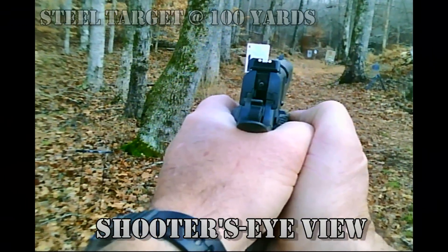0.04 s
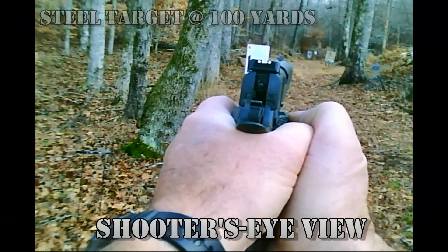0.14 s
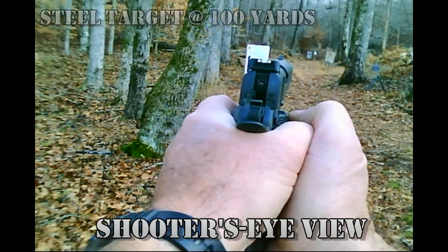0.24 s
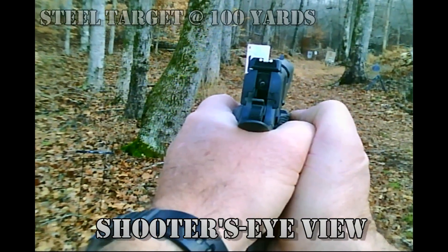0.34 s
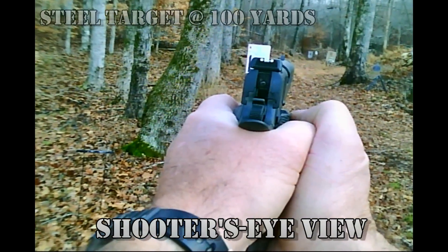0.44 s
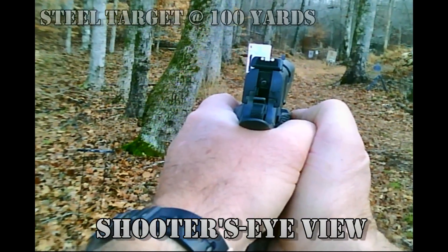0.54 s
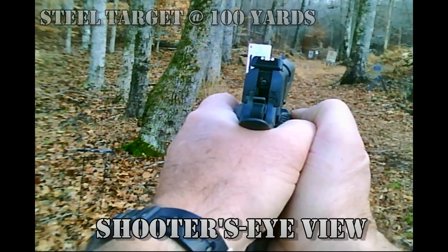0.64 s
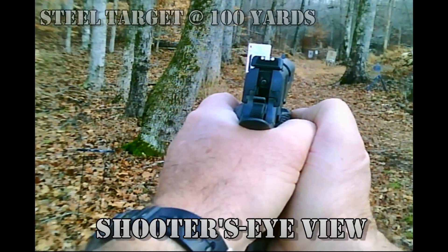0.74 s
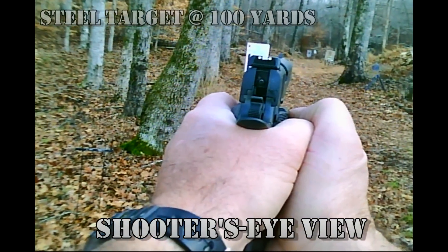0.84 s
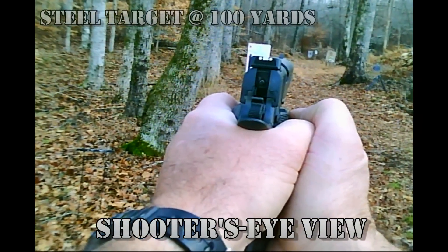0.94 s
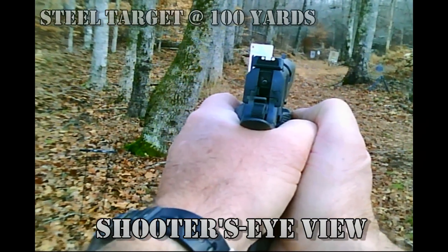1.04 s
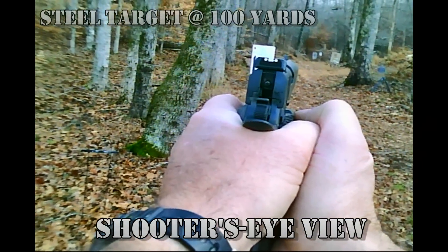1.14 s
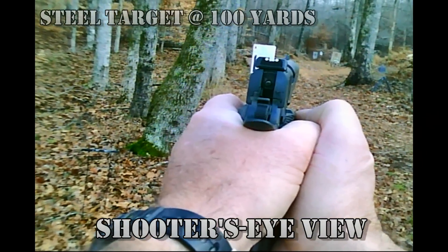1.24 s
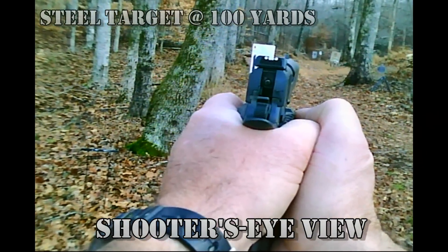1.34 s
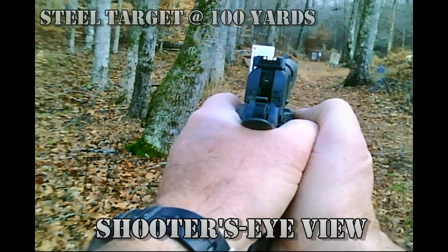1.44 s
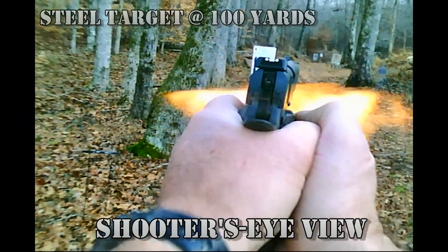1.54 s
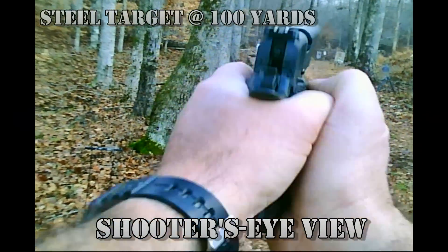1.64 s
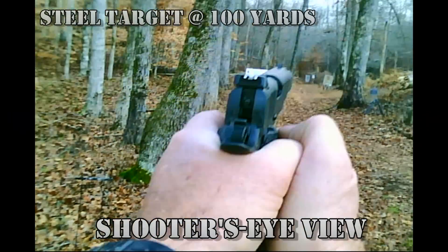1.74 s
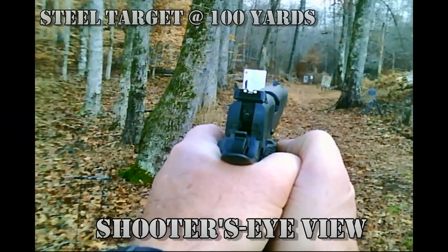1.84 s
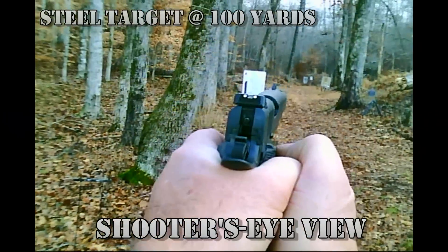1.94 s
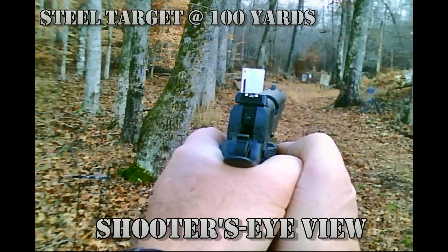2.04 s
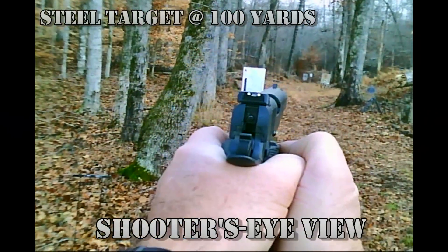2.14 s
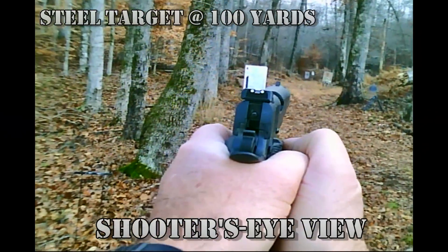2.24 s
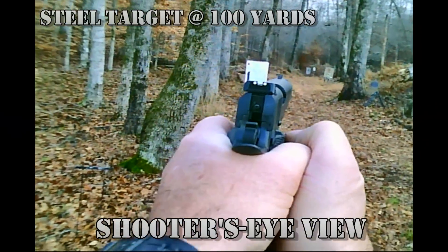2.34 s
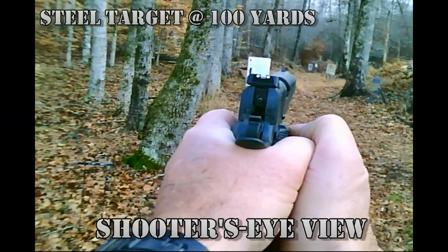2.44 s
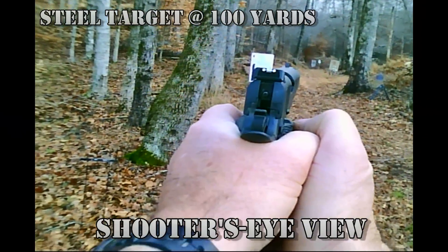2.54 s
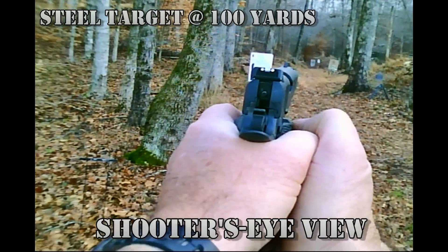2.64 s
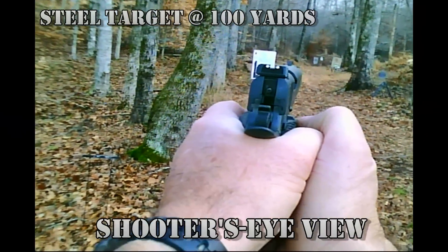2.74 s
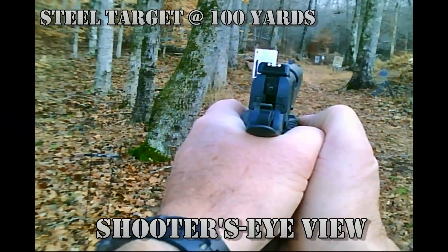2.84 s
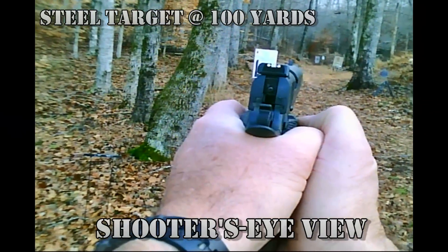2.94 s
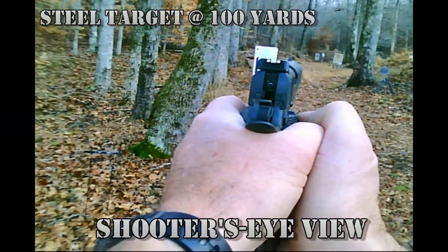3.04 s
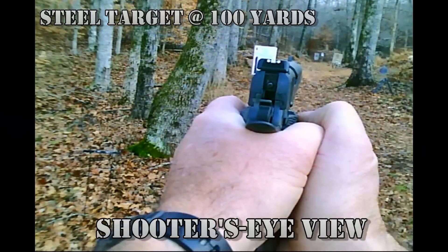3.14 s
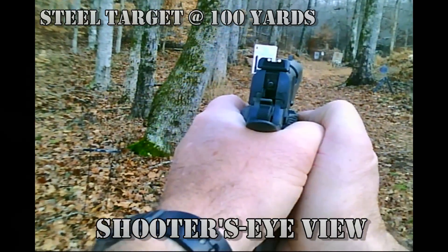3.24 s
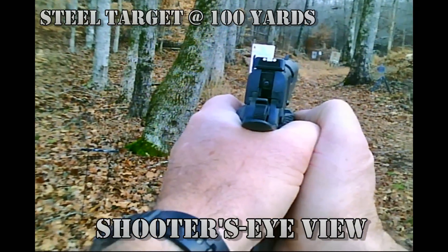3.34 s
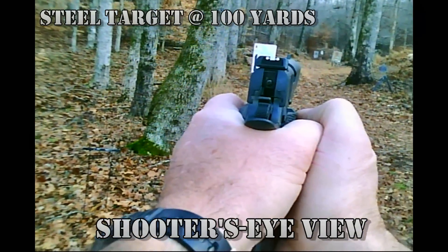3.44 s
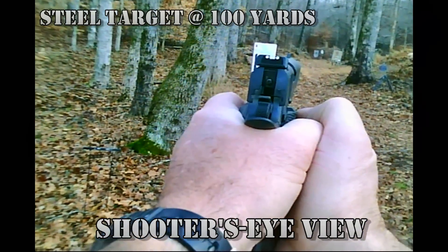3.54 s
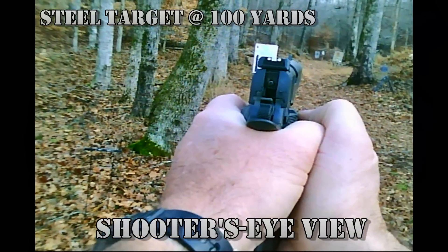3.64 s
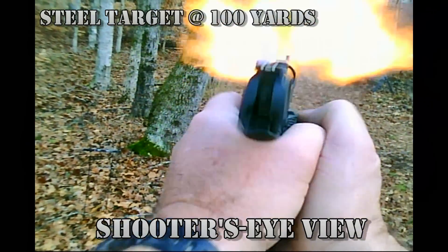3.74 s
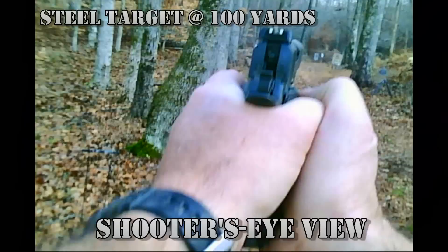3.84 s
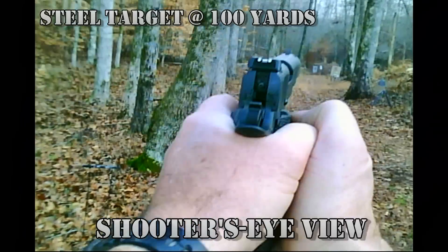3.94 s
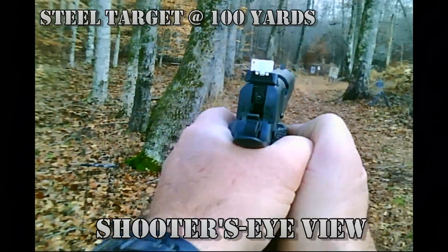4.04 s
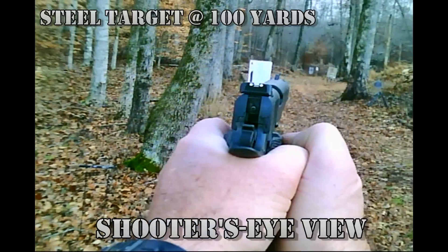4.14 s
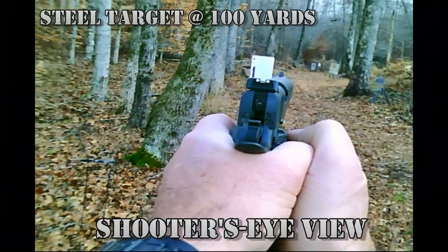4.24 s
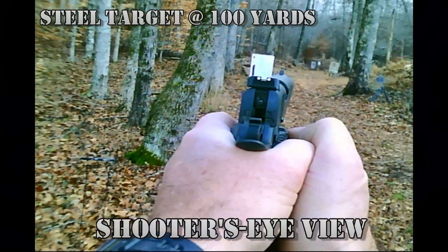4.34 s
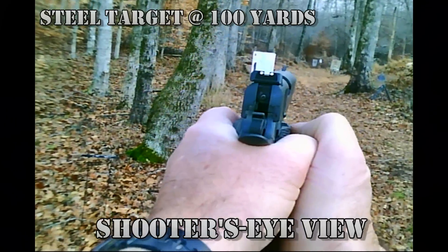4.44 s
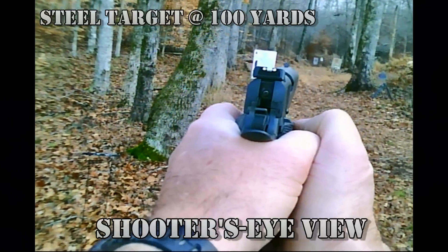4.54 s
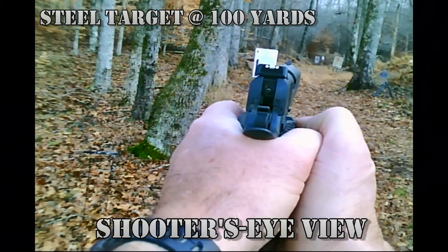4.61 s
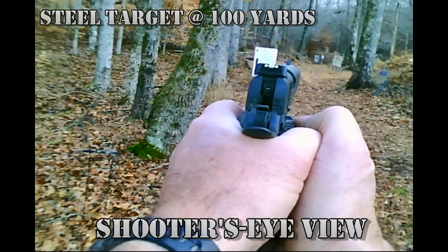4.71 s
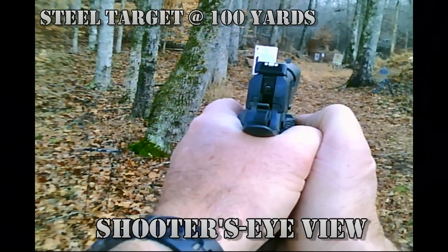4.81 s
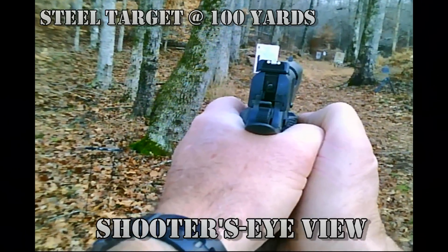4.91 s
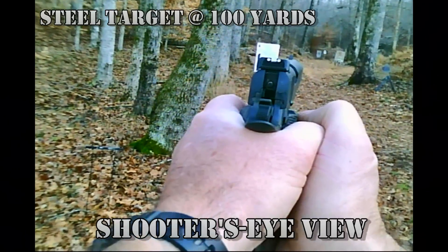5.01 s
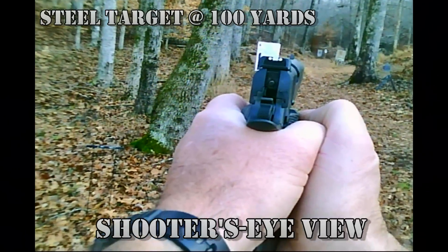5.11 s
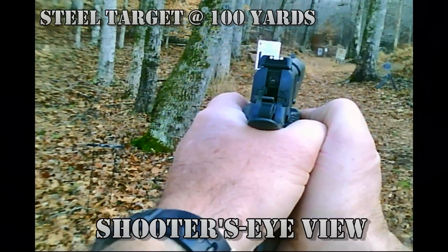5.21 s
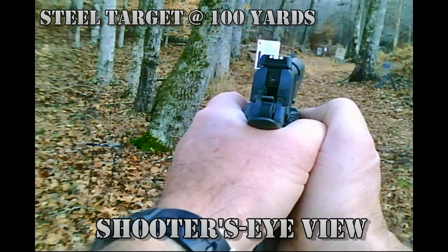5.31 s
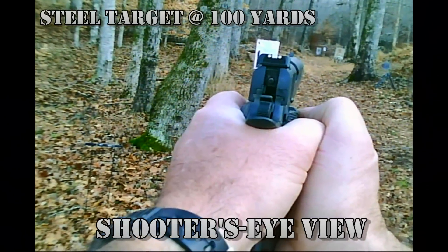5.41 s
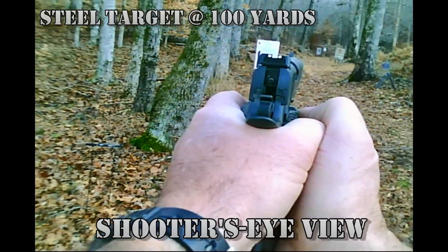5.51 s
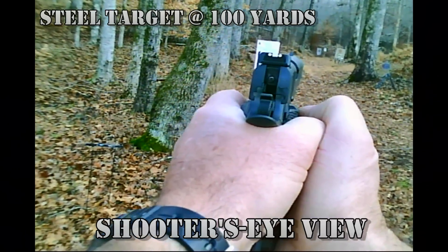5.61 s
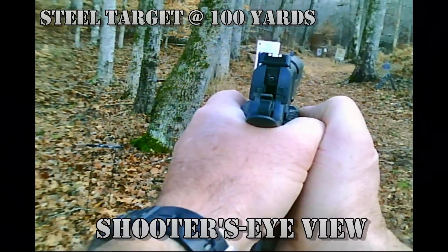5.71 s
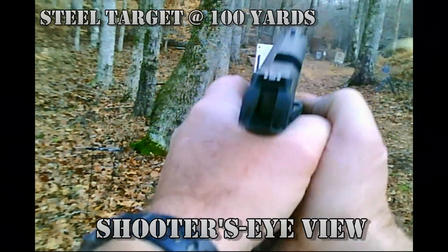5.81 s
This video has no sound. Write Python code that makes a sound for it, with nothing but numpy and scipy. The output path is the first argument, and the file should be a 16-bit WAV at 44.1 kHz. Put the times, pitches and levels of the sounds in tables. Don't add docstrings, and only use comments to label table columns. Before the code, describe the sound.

Outdoors among leafless trees, a faint electronic hiss and distant engine hum precede three well-spaced pistol shots. Heard from right behind the gun, each is an extremely short, overloaded, crackling burst, followed at once by clattering reflections from trunks and soft dull thuds from earth banks. The echoes lose brightness and die away. Tiny bright ticks of a case landing in leaves follow shots one and two; the third stops almost immediately.

```python
import sys
import numpy as np
from scipy import signal
from scipy.fft import rfft, irfft, next_fast_len
from scipy.io import wavfile

SR = 44100
rng = np.random.default_rng(int(sys.argv[2]) if len(sys.argv) > 2 else 0)


def natural_amplitude(level_db):
    exponent = np.asarray(level_db, float) / 20
    return 10 ** exponent


def persist_wave(psi):
    counts = np.round(np.clip(psi, -1, 1) * 32767).astype(np.int16)
    wavfile.write(sys.argv[1], SR, np.atleast_2d(counts).T)


N = 258867
T = np.arange(N) / SR


# (time the front arrives [s], bias rebound [factor], swing level in the lull [dB],
# push in the lull [full scale])
SHOTS = [
    (1.5541, .2, 0, -.1),
    (3.741, .18, -14, .55),
    (5.772, .24, -11, .5),
]
OVER_S = .0198
LITTER_DB, LITTER_T60_S = -27, .17


def blast():
    swing = rms_one(band(rng.standard_normal(N), 120, 1100))
    white = rng.standard_normal(N)
    crackle = rms_one(band(band(white, 900, 3800), 600, 5000))
    litter = rms_one(band(white, 5800, 12500))
    out = np.zeros(N)
    for front, _, lull_db, lull_push in SHOTS:
        after, swing_db, crackle_db, push = stages(lull_db, lull_push)
        s = front + after
        during = (T >= s[0]) & (T < s[-1])
        gas = natural_amplitude(np.interp(T, s, swing_db)) * swing
        gas += natural_amplitude(np.interp(T, s, crackle_db)) * crackle
        gas += np.interp(T, s, push)
        out += during * gas
        litter_db = LITTER_DB - 60 * np.maximum(T - front - OVER_S, 0) / LITTER_T60_S
        out += (T > front) * natural_amplitude(litter_db) * litter
    return out


LEAD_S, LEAD_DB = .0013, -26
MUZZLE_S, MUZZLE_SWING_DB, MUZZLE_CRACKLE_DB = .0042, 17, 7
LULL_CRACKLE_DB = -24
GROUND_S, GROUND_SWING_DB, GROUND_CRACKLE_DB = .0076, 19, 3
SETTLE_S, SETTLE_DROP_DB = .0035, 9
SWING_FADE_DB_PER_S, CRACKLE_FADE_DB_PER_S = 900, 1100
EDGE_S, RELEASE_S, RELEASE_DB = .0006, .005, -14


def stages(lull_db, push):
    settled = GROUND_S + SETTLE_S
    fading = OVER_S - settled
    swing_db = GROUND_SWING_DB - SETTLE_DROP_DB
    crackle_db = GROUND_CRACKLE_DB
    faded_swing_db = swing_db - SWING_FADE_DB_PER_S * fading
    faded_crackle_db = crackle_db - CRACKLE_FADE_DB_PER_S * fading
    return np.transpose([
        (-LEAD_S, 1.5 * LEAD_DB, 1.3 * LEAD_DB, 0),
        (-EDGE_S / 2, 1.3 * LEAD_DB, LEAD_DB, 0),
        (0, MUZZLE_SWING_DB / 2, MUZZLE_CRACKLE_DB, 0),
        (MUZZLE_S / 3, MUZZLE_SWING_DB, MUZZLE_CRACKLE_DB, 0),
        (MUZZLE_S, MUZZLE_SWING_DB / 2, MUZZLE_CRACKLE_DB / 3, 0),
        (MUZZLE_S + EDGE_S, lull_db, LULL_CRACKLE_DB, push),
        (GROUND_S - EDGE_S, lull_db, LULL_CRACKLE_DB, push),
        (GROUND_S, GROUND_SWING_DB, crackle_db, 4 * max(push, 0)),
        (settled, swing_db, crackle_db, 0),
        (OVER_S, faded_swing_db, faded_crackle_db, 0),
        (OVER_S + 2 * EDGE_S, RELEASE_DB, RELEASE_DB, 0),
        (OVER_S + RELEASE_S, 2 * RELEASE_DB, 2 * RELEASE_DB, 0)])


CREEP, CREEP_S, DIP, DIP_S = 1.8, .055, 2.9, .013


def bias():
    out = np.zeros(N)
    for front, rebound, *_ in SHOTS:
        t = np.maximum(T - front - OVER_S, 0)
        creep = CREEP * np.exp(-t / CREEP_S)
        dip = DIP * np.exp(-t / DIP_S)
        out += (T > front + OVER_S) * rebound * (creep - dip)
    return out


# (time after the shot [s], level [dB])
ECHO_COURSE = [(.02, 1), (.11, 3), (.16, 1), (.24, 2.5), (.32, -0.5), (.95, -3), (1.4, 3.5), (1.8, 8.5),
               (2.15, 18)]
ECHO_DB = -18


def wood():
    t = T[:int(2.15 * SR)]
    reply = die_away(trunks(t), t)
    reply /= np.sqrt(np.mean(reply[:, 900:2900] ** 2))
    fade_in = np.clip((t - .012) / 0.0039, 0, 1)
    reply = natural_amplitude(ECHO_DB + np.interp(t, *np.transpose(ECHO_COURSE))) * reply * fade_in
    reply += banks(t)
    out = np.zeros(N + len(t))
    for (front, *_), one in zip(SHOTS, reply):
        start = round(front * SR)
        out[start:start + len(t)] += one
    return out[:N]


# (time after the front [s], level above the scatter [dB])
TRUNKS = [(.0229, 8), (.0287, 6), (.0325, 7), (.0358, 6), (.0535, 10), (.0611, 7), (.068, 7), (.0763, 9),
          (.0954, 6), (.0977, 8), (.1003, 7), (.2496, 9), (.2867, 10)]
TRUNK_DB = 11
STAND_FROM_S, STAND_TO_S, STAND_PER_S, STAND_DB = .11, .42, 90, 6.5


def trunks(t):
    chance = np.minimum((12000 + 40000 * t) / SR, 1)
    sizes, draw = rng.standard_normal((4, len(t))), rng.random((4, len(t)))
    clicks = sizes * (draw < chance) / np.sqrt(chance)
    stand = (draw[0] < STAND_PER_S / SR) & (t > STAND_FROM_S) & (t < STAND_TO_S)
    clicks[0, stand] = -natural_amplitude(STAND_DB + TRUNK_DB)
    for s, db in TRUNKS:
        clicks[0, round(s * SR)] = -natural_amplitude(db + TRUNK_DB)
    return clicks


# (frequency [Hz], level [dB per Hz])
WOOD = [(40, -29), (91, -3.5), (168, -9.5), (430, -9), (690, 0), (1440, -7.5), (1900, -1.5), (2620, -15.5),
        (3350, -8.5), (3940, -18.5), (5500, -23), (9500, -30.5), (12500, -30.5), (15500, -27.5)]
# (frequency [Hz], near t60 [s], far t60 [s], far share [dB])
DYING = [(60, .3, 0.71, -23), (112, 0.16, 0.77, -19), (200, .4, 1.3, -21.5), (294, .35, 1.8, -17.5),
         (504, 0.29, 1.9, -18.5), (900, 0.36, 2.1, -22), (2000, 0.27, 1.92, -22.5), (3564, 0.24, 1.8, -22),
         (4722, 0.4, 1.3, -17.5), (7000, .18, 1.2, -15), (10133, 0.28, 0.43, -13.5),
         (13000, .14, 0.66, -10), (16010, .12, .66, -8.5)]


def die_away(clicks, t):
    size = next_fast_len(len(t))
    hz = np.arange(size // 2 + 1) * SR / size + 1
    mixed = clicks[0] * .87 + clicks[1:] * .48
    heard = rfft(mixed, size) * natural_amplitude(at_hz(WOOD, hz))
    reply = np.zeros((3, len(t)))
    for centre in 30 * 2 ** (np.arange(20) / 2):
        share = np.clip(1 - 2 * np.abs(np.log2(hz / centre)), 0, 1)
        near, far, far_db = (at_hz(DYING, centre, column=k) for k in (1, 2, 3))
        dying = np.sqrt(natural_amplitude(-120 * t / near) + natural_amplitude(2 * far_db - 120 * t / far))
        reply += irfft(heard * share, size)[:, :len(t)] * dying
    return reply


# (time after the shot [s], level [dB], pitch [Hz])
BANKS = [
    (0.127, -41, 95),
    (0.248, -46, 92.5),
    (.47, -58, 85),
]


def banks(t):
    out = np.zeros(len(t))
    for s, db, hz in BANKS:
        out += natural_amplitude(db) * np.exp(-((t - s) / .011) ** 2) * np.sin(2 * np.pi * hz * (t - s))
    return out


# (time [s], peak level [dB], pitch [Hz], fade [s])
CASE = [(1.975, -41.5, 4500, 0.00042), (2.005, -52, 5000, .005), (2.015, -49.5, 4500, .003),
        (2.023, -50.5, 4500, 0.0022), (2.153, -58.5, 4000, 0.0011), (4.166, -52, 3600, .002),
        (4.169, -45, 4500, 0.00088), (4.187, -54, 6000, .005), (4.191, -52, 7300, .004),
        (4.1965, -40.5, 3520, 0.0054), (4.24, -58, 4000, .001)]


def case():
    noise, out = rng.standard_normal(N), np.zeros(N)
    t = T[:600]
    for s, db, hz, fade in CASE:
        i = round(s * SR)
        tick = noise[i:i + len(t)] * np.exp(-t / fade)
        rustle = band(band(tick, 2400, 7500), 2000, 8000)
        tick = rustle + 1.6 * band(tick, hz * .85, hz * 1.15)
        out[i:i + len(t)] += natural_amplitude(db) * tick / np.max(np.abs(tick))
    return out


# (frequency [Hz], level [dB per Hz])
HISS = [(7, -29), (12, -8.5), (31, -26.5), (54, -31.5), (109, -36.5), (300, -42), (542, -44.5),
        (1190, -46.5), (2000, -52), (3200, -52), (5000, -52.5), (9870, -55), (12500, -56.5), (17000, -56)]
# (time [s], level [dB])
BREEZE = [(0, -2.5), (.5, -1), (1.0, 1.5), (1.5, 2.5), (2.5, -1), (3.5, 1), (4.5, 0.5), (5.87, 0)]
HISS_DB = -64


def hiss():
    white = rng.standard_normal((2, N + SR))
    swell = natural_amplitude(np.interp(T, *np.transpose(BREEZE)))
    out = np.zeros(N)
    for k, (low, high, hz) in enumerate(bands()):
        part = natural_amplitude(at_hz(HISS, hz)) * band(white[k % 2], low, high)[SR:]
        out += part * (swell if 35 < hz < 1400 else 1)
    return natural_amplitude(HISS_DB) * rms_one(out)


# (frequency [Hz], level [dB rms])
WHINE = [(1200, -86), (3892, -81), (5001, -93), (5599, -90), (6202, -95), (7402, -89.5), (9598, -88.5)]


def whine():
    return sum(np.sqrt(2) * natural_amplitude(db) * np.sin(2 * np.pi * hz * T) for hz, db in WHINE)


# (multiple of HUM_HZ [-], level [dB rms])
HUM = [(1, -66), (2, -78.5), (3, -85.5), (4, -88)]
HUM_HZ = 28.1


def hum():
    turn = 2 * np.pi * HUM_HZ * T + np.cumsum(rng.standard_normal(N)) * 0.011
    return sum(np.sqrt(2) * natural_amplitude(db) * np.sin(k * turn) for k, db in HUM)


def rms_one(x):
    return x / np.sqrt(np.mean(x ** 2) + 1e-20)


def at_hz(points, hz, column=1):
    points = np.array(points)
    return np.interp(np.log(hz), np.log(points[:, 0]), points[:, column])


def band(x, low_hz, high_hz):
    return signal.sosfilt(signal.butter(2, [low_hz, high_hz], "band", fs=SR, output="sos"), x)


def bands():
    edges = 12 * 2 ** (np.arange(33) / 3)
    return zip(edges, edges[1:], np.sqrt(edges[1:] * edges[:-1]))


OFFSET = -.0078


def scene():
    shot = blast() + bias() + wood()
    background = hiss() + whine() + hum() + OFFSET
    return (shot + case() + background)[None]


def top_cut(x):
    return signal.sosfilt(signal.butter(12, 16660, fs=SR, output="sos"), x)


def record(dry):
    size = np.abs(dry)
    over = np.interp(size, [1, 1.25, 2.0, 2.6], [0.62, -1.2, -0.71, 0])
    folded = np.sign(dry) * np.where(size < 1, size, over)
    smooth = signal.sosfilt(signal.butter(4, 11000, fs=SR, output="sos"), 1.1 * folded)
    steep = signal.cheby2(10, 60, 16700, fs=SR, output="sos")
    mix = signal.sosfilt(steep, np.clip(smooth, -.96, .96))
    return top_cut(np.clip(mix, -1.0, 1.0))


dry = scene()
out = record(dry)
persist_wave(out)
```